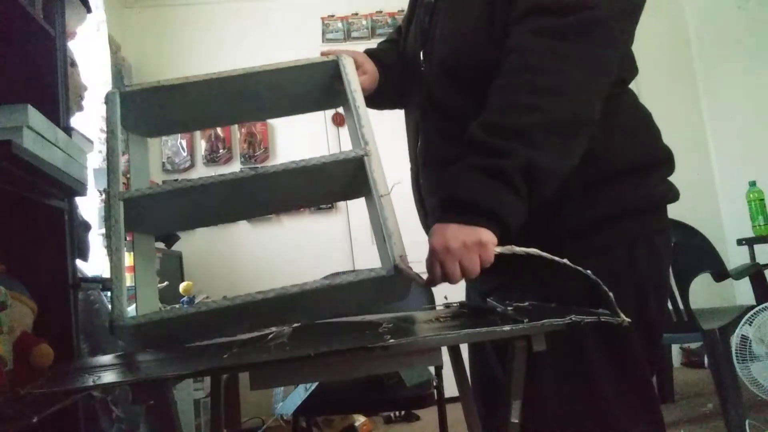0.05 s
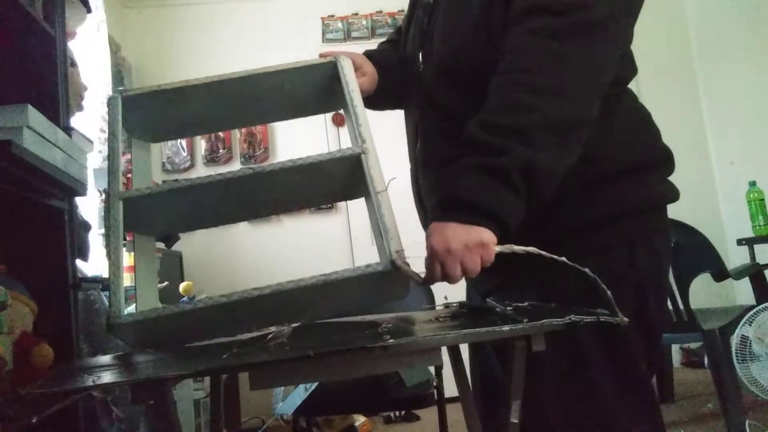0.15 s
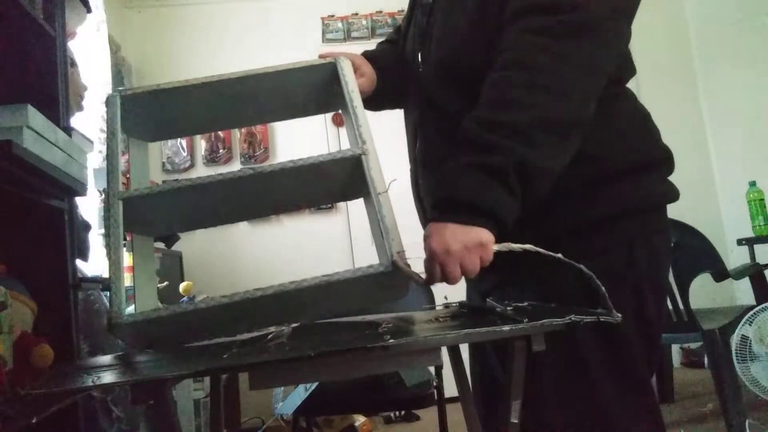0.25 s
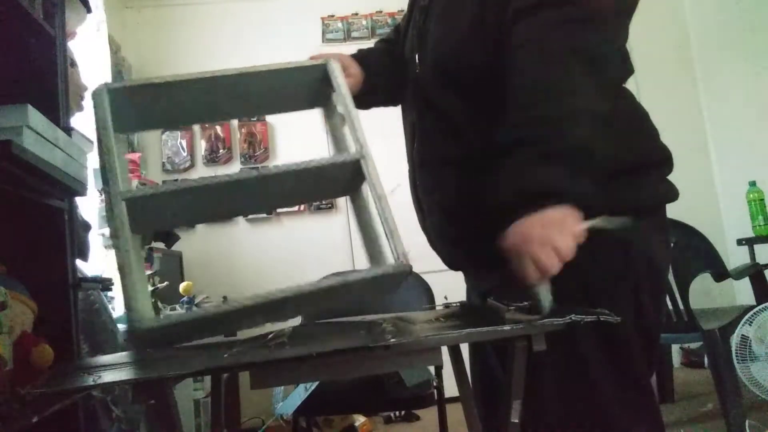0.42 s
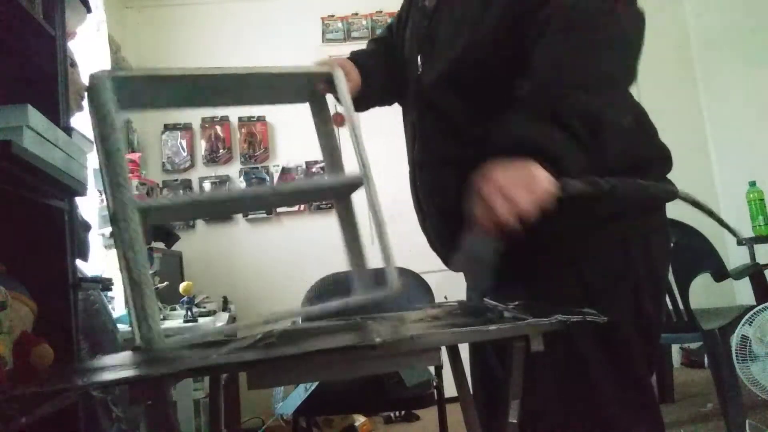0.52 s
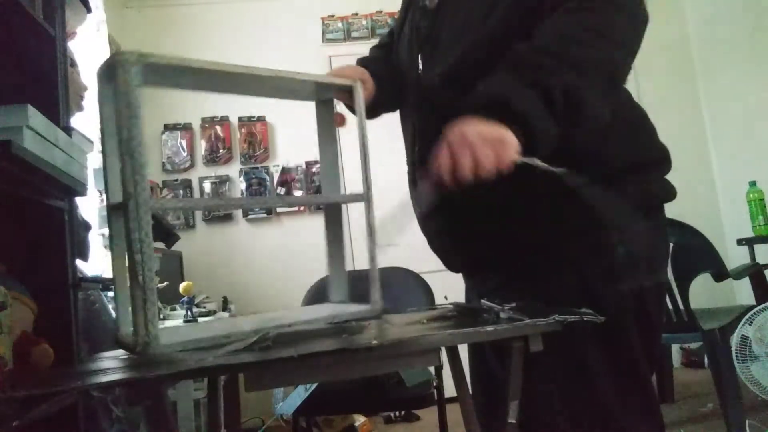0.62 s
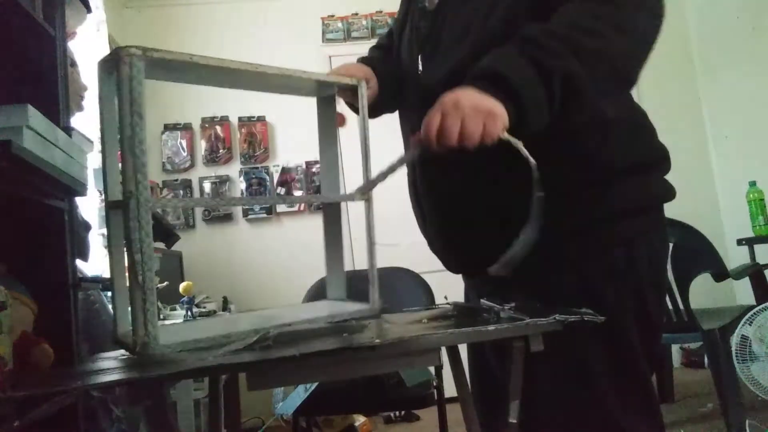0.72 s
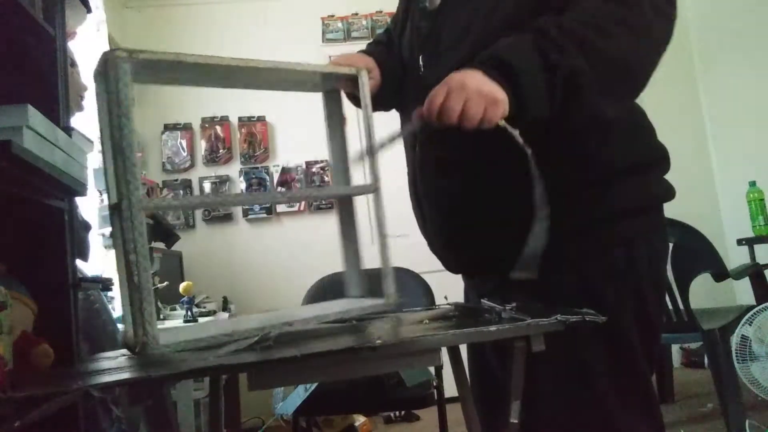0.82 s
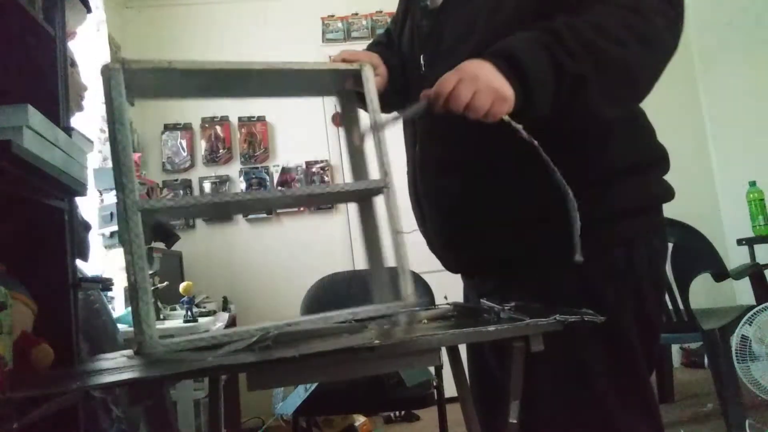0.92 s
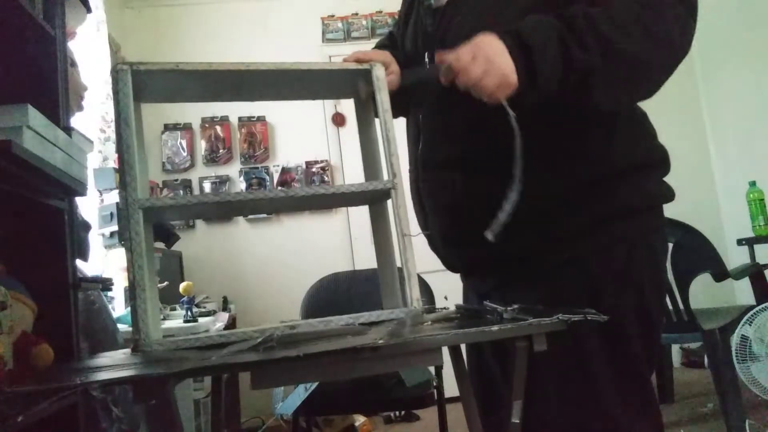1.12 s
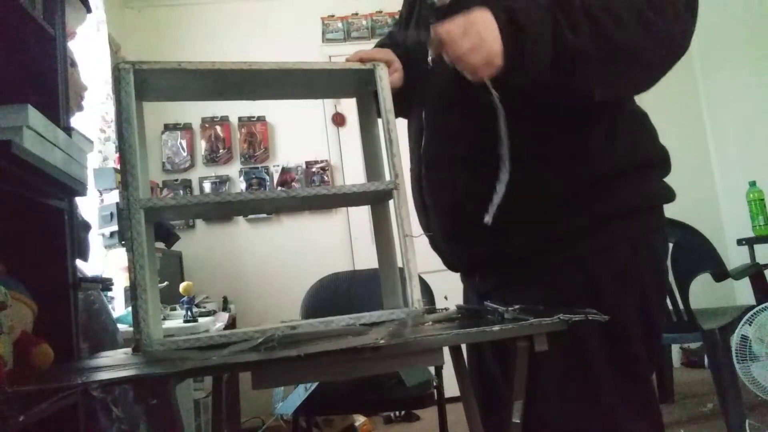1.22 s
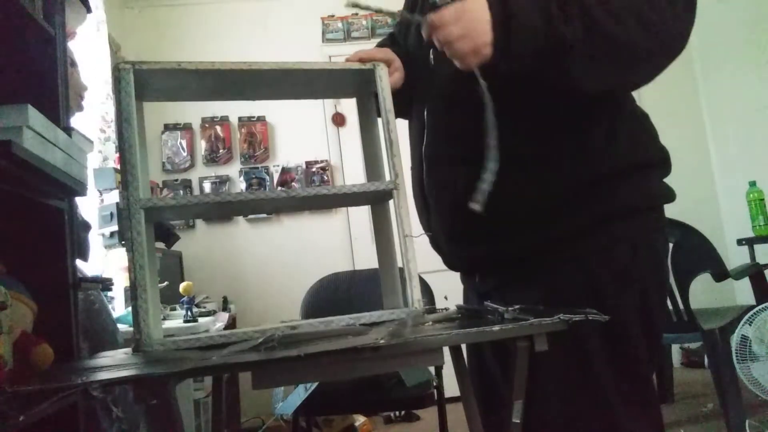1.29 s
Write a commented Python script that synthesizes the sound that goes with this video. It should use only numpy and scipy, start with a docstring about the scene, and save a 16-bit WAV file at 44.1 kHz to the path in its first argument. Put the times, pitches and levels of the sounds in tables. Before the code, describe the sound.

A thin strip of trim splinters, snaps sharply and rips off a wooden shelf in three crackling pulls. The shelf rocks and thumps on a table, with faint metallic tinkles, a few steps away in a small room.

```python
"""A small room, one microphone a few steps from an old wooden shelf that stands on a table.
Something small and metallic, perhaps a tack, tinkles as a thin strip of trim is torn off the shelf.
The strip cracks, splinters and, a quarter of a second in, snaps loose and sets the boards ringing.
It rips along the edge in three pulls, fibres and glue crackling, while the shelf rocks and thumps
on the table. A last tinkle dies away in the room."""
import sys
import numpy as np
from scipy import signal
from scipy.fft import rfft, irfft
from scipy.io import wavfile

SR = 44100
rng = np.random.default_rng(int(sys.argv[2]) if len(sys.argv) > 2 else 0)


def log_audio(samples):
    """Write samples as a 16-bit WAV file to the path given in sys.argv[1]."""
    # one column per channel
    frames = np.atleast_2d(samples).T
    # limit to full scale, then quantise
    limited = np.clip(frames, -1, 1)
    pcm = np.round(limited * 32767).astype(np.int16)
    wavfile.write(sys.argv[1], SR, pcm)


N = 59535
T = np.arange(N) / SR
FIBRES_PER_S = 1800


# the strip cracks: t/s, level/dB, decay/s, tilt/(dB per octave), ring of the boards/dB; the first row is a
# faint ring of the boards, already dying away as the sound begins
CRACKS = [(0.0010, -60, .004, -3.5, -56.5), (0.1656, -35, 0.0029, -.5, -42.5),
          (0.237, -7.5, 0.0037, 1.97, -7), (0.2442, -10, 0.0078, -0.5, -30.5),
          (0.2530, -11.5, 0.0095, -1.4, -22), (0.284, -28, 0.0016, -1, -31)]
# a crack's spectrum: f/Hz, level/dB
CRACK_SPECTRUM = [(40, -27.5), (125, -7.5), (185, -15.5), (260, -4.5), (400, -27.5), (560, -14), (680, -1),
                  (1250, -3), (1900, -4.5), (3300, -10), (5400, -1), (7000, -14), (9000, -24),
                  (11500, -17.5), (15500, -33.5)]
def cracks():
    """The wood gives way and the strip snaps loose."""
    return fractures(CRACKS, CRACK_SPECTRUM)


# splinters before the snap, thin ticks after it: t/s, level/dB, decay/s, tilt/(dB per octave)
SPLINTERS = [(0.1700, -25.5, .002, -1), (0.2105, -33.5, 0.0028, -2.5), (0.2180, -18, 0.012, 2),
             (0.2230, -14, .004, -1.5)]
TICKS = [(0.3580, -47, 0.0015, 5), (0.3940, -30, 0.0046, -3), (0.4835, -43, .002, 18)]
# their spectra: f/Hz, level/dB
SPLINTER_SPECTRUM = [(100, -23.5), (700, -13), (1500, -14.5), (3000, -3.5), (5500, 3), (8000, -8),
                     (10000, -20), (15000, -25)]
TICK_SPECTRUM = [(300, -24), (3000, -1.5), (5500, 2), (8000, -7.5), (11500, 4), (15500, -12.5)]
def splintering():
    """Fibres splinter just before the snap; later, single ones part with a tick."""
    splinters = fractures(SPLINTERS, SPLINTER_SPECTRUM, wet_db=-6.5)
    return splinters + fractures(TICKS, TICK_SPECTRUM, wet_db=-1)


def fractures(breaks, spectrum, wet_db=0):
    """Each break is one click and a quickly dying run of smaller ones, heard through the room."""
    out = 0
    for start, db, decay, tilt_db, *_ in breaks:
        clicks = rng.standard_normal(N) * (rng.random(N) < FIBRES_PER_S / SR) * np.exp(-T / decay)
        clicks[0] = 2  # the opening click
        in_room = convolve(unit(clicks), room(wet_db))
        out += from_db(db) * at_time(colour(in_room, spectrum, tilt_db), start)
    return out


# the pull along the edge: t/s, level/dB, treble against the rest/dB
PULL = [(.16, -110, -5), (0.171, -35.5, -14), (.205, -37.5, 12.5), (.33, -45, -1), (.38, -50, 9),
        (.42, -34.5, 4.5), (.445, -33.5, -4), (.47, -33.5, -1), (0.514, -37.5, 0), (.528, -29, -0.5),
        (.565, -26.5, -7), (.585, -48, 7.5), (.68, -52, -13), (.74, -68.5, -5.5), (0.818, -70, 1),
        (0.832, -31, -24), (0.852, -34, -9.5), (0.868, -29.5, 4), (.88, -30.5, -12), (0.892, -24, -1.5),
        (.915, -29, -18.5), (0.934, -47.5, 2), (.99, -50, -7), (1.012, -41.5, -7), (1.04, -54.5, -16),
        (1.069, -52, -4.5), (1.085, -81, -10), (1.151, -107, -6)]
# the rip's spectrum: f/Hz, level/dB
TEAR_SPECTRUM = [(60, -20.5), (160, -4), (230, 3.5), (320, -7.5), (430, -16), (670, -3.5), (850, -6),
                 (1500, -3), (2000, -6.5), (3200, -9), (4300, -6), (5100, -1.5), (6500, -8.5),
                 (8500, -19.5), (12000, -27.5), (15500, -36)]
def tearing(spread_db=4, treble_edge_hz=6100):
    """Fibres and glue give way in a dense crackle that follows the pull."""
    sizes = from_db(spread_db * np.minimum(rng.exponential(1, N), 4)) * rng.choice([-1, 1], N)
    clicks = unit(sizes * (rng.random(N) < FIBRES_PER_S / SR)) * np.sqrt(N)
    times, level_db, treble_db = np.transpose(PULL)
    # zero phase, so that subtracting it leaves only the treble
    dull = signal.sosfiltfilt(signal.butter(3, treble_edge_hz, fs=SR, output="sos"), clicks)
    treble = from_db(np.interp(T, times, treble_db)) * (clicks - dull)
    crackle = from_db(np.interp(T, times, level_db)) * (dull + treble)
    return colour(convolve(crackle, unit(room())), TEAR_SPECTRUM)


# modes of the shelf's boards: f/Hz, level/dB, t60/s
BOARD_MODES = [(137.6, -17, 0.093), (216.4, -23, .3), (277.3, -11.5, 0.18), (673, -7, 0.18), (821, -9, .17),
               (929, -8.5, .17), (993, -9.5, .17), (1177, -10.5, 0.2), (1283, -9.5, .17), (1373, -12, 0.24)]
# the frame gives under the strain: t/s, level/dB, f/Hz
STRAINS = [(0.0, -51.5, 200), (0.168, -35.5, 238), (0.382, -35.5, 238)]
def boards(strain_t60_s=0.23):
    """The shelf rings with each crack, and its frame sounds low notes under strain."""
    modes = ring(BOARD_MODES)
    struck = sum(from_db(ring_db) * at_time(modes, start) for start, *_, ring_db in CRACKS)
    strained = sum(at_time(ring([(hz, db, strain_t60_s)]), start) for start, db, hz in STRAINS)
    return struck + strained


# the rocking shelf lands on the table: t/s, level/dB, contact/s
KNOCKS = [(0.4254, -15, 0.0055), (0.4732, -19.5, 0.0062), (0.554, -28.5, 0.0035), (0.8272, -20, 0.0035),
          (0.886, -24.5, 0.0029), (0.9500, -30, 0.0027), (1.0100, -37, .004)]
# modes of the table top: f/Hz, level/dB, t60/s
TABLE_MODES = [(72.37, -16.5, 0.52), (87, -23.5, 0.59), (119.7, -8, 0.46), (143, -4.5, 0.302),
               (211.8, -5, 0.26), (254.6, -8.5, 0.33), (670, -16.5, 0.19), (663.4, 7, 0.25)]
# the thud in the room: f/Hz, level/dB
THUD_SPECTRUM = [(30, -14), (55, -14.5), (75, 0), (125, 0.5), (175, -9), (240, -2), (400, -11), (700, 2.5),
                 (1500, -33), (6000, -47)]
def knocks(thud_db=3.5):
    """Soft blows, each a smooth push, set the table top booming; a longer contact is duller."""
    out, modes = 0, ring(TABLE_MODES)
    for start, db, contact in KNOCKS:
        push = T ** 2 * np.exp(-2 * np.pi * T / contact)
        boom = modes + from_db(thud_db) * colour(room(), THUD_SPECTRUM)
        out -= from_db(db) * at_time(convolve(boom, push / push.sum()), start)
    return out


# faint touches on the metal: t/s, level/dB
TINKLES = [(0.001, -56.5), (0.046, -58.5), (0.080, -61), (0.119, -57), (0.745, -62), (0.781, -59),
           (1.2017, -52.5)]
# its modes: f/Hz, level/dB, t60/s
TACK_MODES = [(1712, -7.5, 0.042), (2340, -4.5, .09), (2660, -13.5, 0.14), (3060, -13.5, 0.14),
              (3250, -2.5, 0.18), (3630, -12, .14), (4120, -5, .14), (4940, -4.5, 0.12), (5350, -3.5, .07),
              (5820, -7, 0.3), (6230, -1.5, 0.042), (8550, -16.5, .07)]
# the click of contact: f/Hz, level/dB
TACK_SPECTRUM = [(300, -42), (1400, -32.5), (3300, 3.5), (5200, 4), (6500, 0.5), (7000, -27.5),
                 (15000, -39.5)]
def tinkles():
    """Light touches on a small piece of metal; its short ring has no bass and lingers in the room."""
    out, modes = 0, unit(ring(TACK_MODES))
    for start, db in TINKLES:
        space = room()
        touch = convolve(space, modes) + colour(space, TACK_SPECTRUM)
        out += from_db(db) * at_time(touch, start)
    return low_cut(out, hz=1400, order=4)


# how long the small room rings: f/Hz, t60/s
ROOM_DECAY = [(70, .68), (200, .42), (400, .3), (1500, .3), (5000, .3), (12000, .29)]
def room(wet_db=0, direct_db=19.5, early_db=5.5, early_s=0.024):
    """From shelf to microphone: direct sound, close reflections and a tail that dies band by band."""
    hz = np.arange(N // 2 + 1) * SR / N
    white = rfft(rng.standard_normal(N))
    tail = 0
    for centre, t60 in ROOM_DECAY:
        band = at_hz([(f, f == centre) for f, _ in ROOM_DECAY], hz)
        tail += irfft(white * band, N) * from_db(-60 * T / t60)
    early = from_db(early_db)
    response = from_db(wet_db) * tail * (1 + early * np.exp(-T / early_s)) / (1 + early)
    response[0] += from_db(direct_db)
    return response


# the quiet room: f/Hz, level/dB
ROOM_TONE = [(30, -1), (90, -6), (200, -15.5), (400, -22), (1000, -21), (2500, -16), (5000, -16.5),
             (8000, -28), (15000, -28.5)]
def room_tone(level_db=-71.5):
    """A faint, steady rumble and hiss behind everything."""
    return from_db(level_db) * colour(rng.standard_normal(N), ROOM_TONE)


def ring(modes):
    """Decaying sines of a struck object."""
    return sum(from_db(db - 60 * T / t60) * np.sin(2 * np.pi * hz * T) for hz, db, t60 in modes)


def colour(x, spectrum, tilt_db=0, size=8192):
    """Causal filter with the given spectrum, tilted per octave; white noise keeps its level."""
    hz = np.arange(size // 2 + 1) * SR / size
    gain = from_db(at_hz(spectrum, hz) + tilt_db * np.log2(np.maximum(hz, 1)))
    cepstrum = irfft(np.log(gain))
    cepstrum[1:size // 2] *= 2  # fold onto positive time for minimum phase
    cepstrum[size // 2 + 1:] = 0
    return convolve(x, unit(irfft(np.exp(rfft(cepstrum)))))


def low_cut(x, hz, order):
    """Roll off what lies below hz."""
    return signal.sosfilt(signal.butter(order, hz, "high", fs=SR, output="sos"), x)


def from_db(db):
    """Decibels to gain."""
    return 10 ** (np.asarray(db) / 20)


def at_hz(points, hz):
    """Read a table on a log-frequency axis."""
    f, values = np.transpose(points)
    return np.interp(np.log(np.maximum(hz, 1)), np.log(f), values)


def unit(x):
    """Scale to an energy of one."""
    return x / np.sqrt(np.sum(x ** 2) + 1e-20)


def convolve(x, response):
    """Play x through a response."""
    return signal.fftconvolve(x, response)[:N]


def at_time(x, s):
    """Start a sound at s seconds."""
    return np.concatenate([np.zeros(max(int(s * SR), 0)), x])[:N]


def scene():
    """All sources over the quiet room, in mono at the microphone."""
    breaks = cracks() + splintering()
    background = room_tone()
    return (breaks + tearing() + boards() + knocks() + tinkles() + background)[None]


def record(dry, ceiling=0.92, top_hz=15650):
    """The microphone chain drops the deepest bass, rounds the loudest peaks and cuts the top."""
    thinned = low_cut(dry, hz=52, order=2)
    rounded = ceiling * np.tanh(thinned / ceiling)
    return signal.sosfilt(signal.ellip(12, .2, 90, top_hz, fs=SR, output="sos"), rounded)


dry = scene()
out = record(dry)
log_audio(out)
```